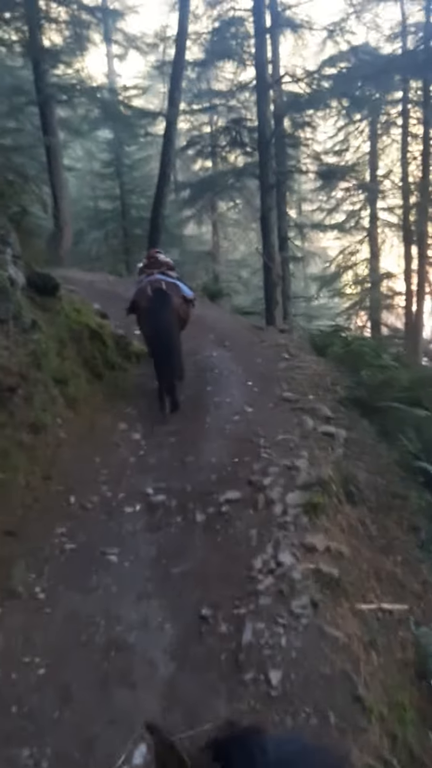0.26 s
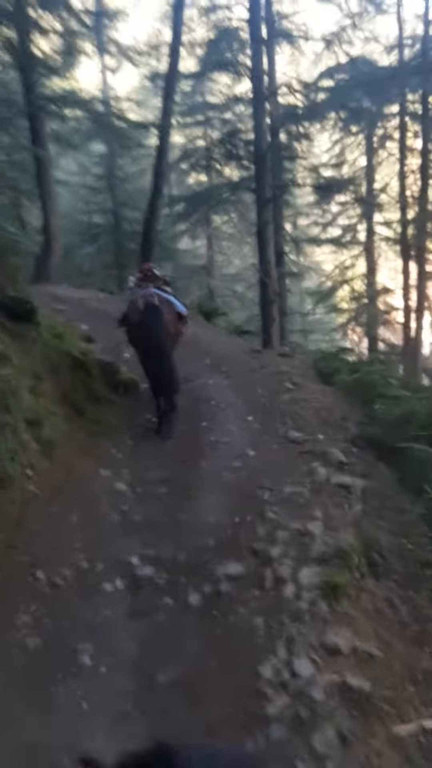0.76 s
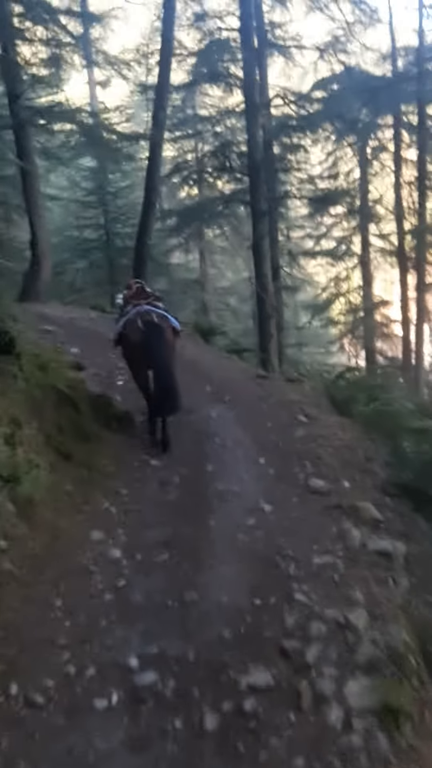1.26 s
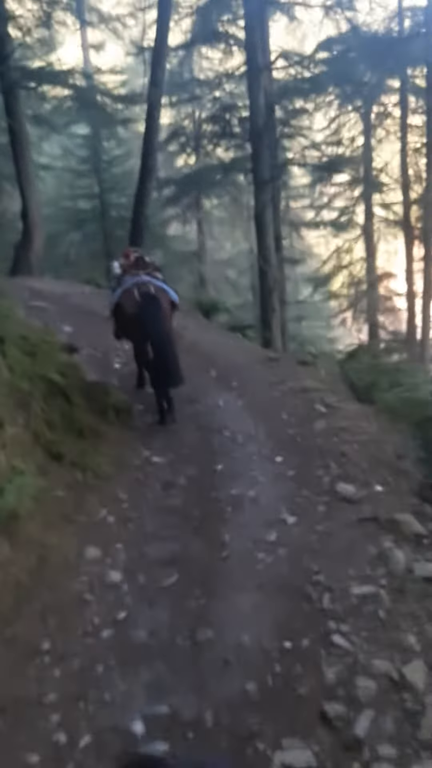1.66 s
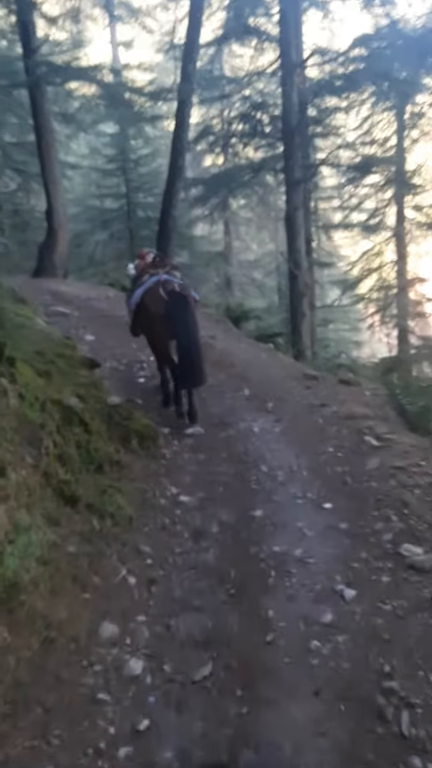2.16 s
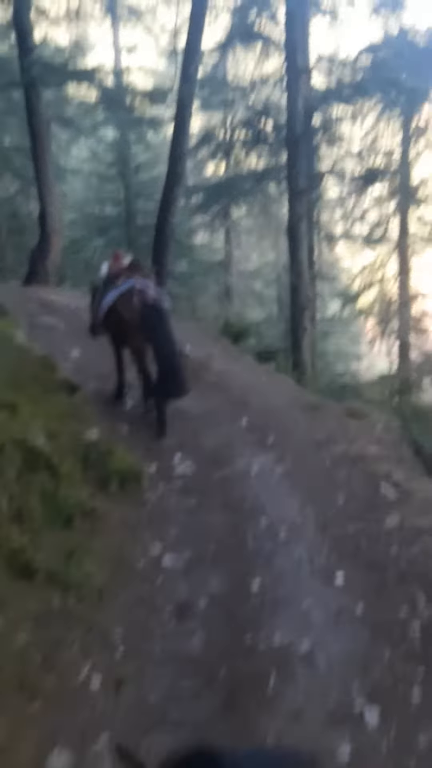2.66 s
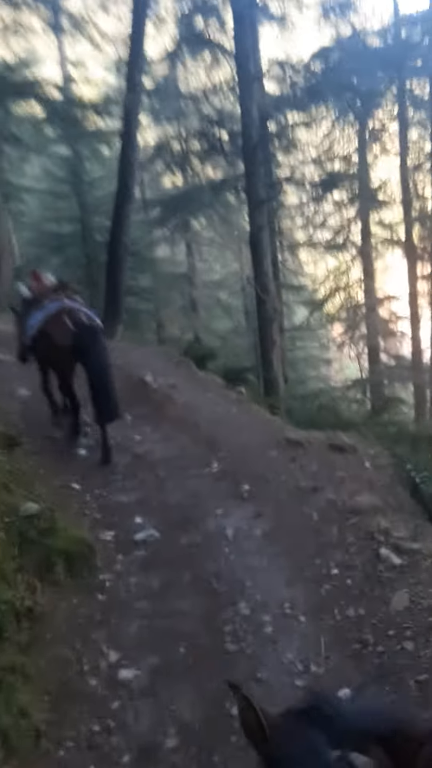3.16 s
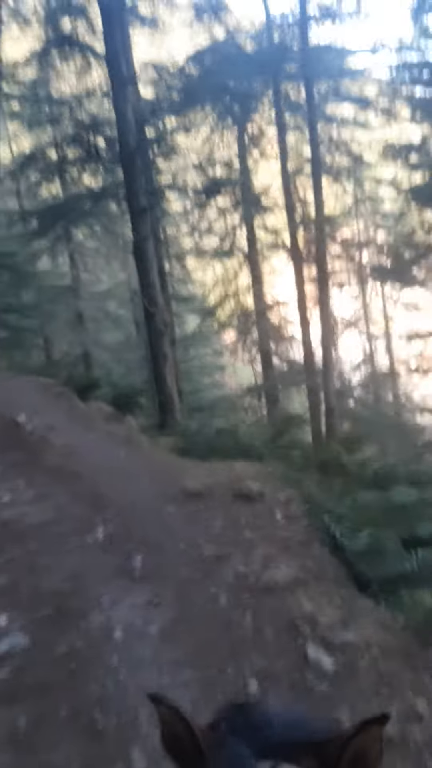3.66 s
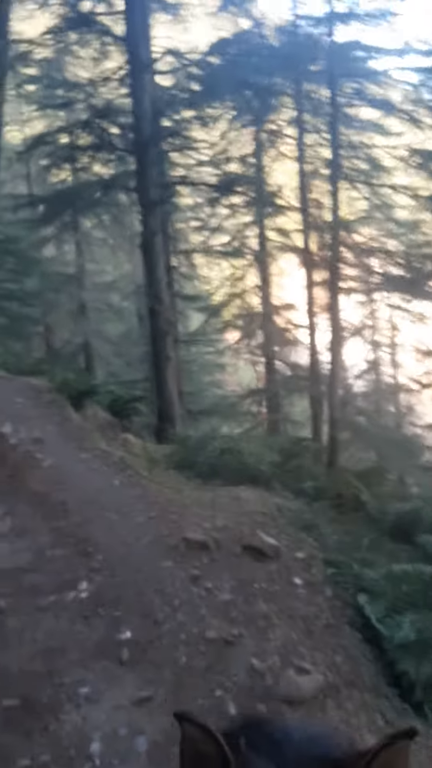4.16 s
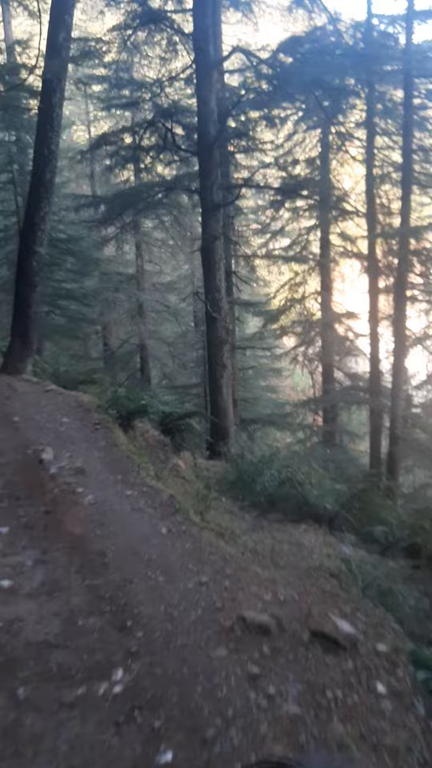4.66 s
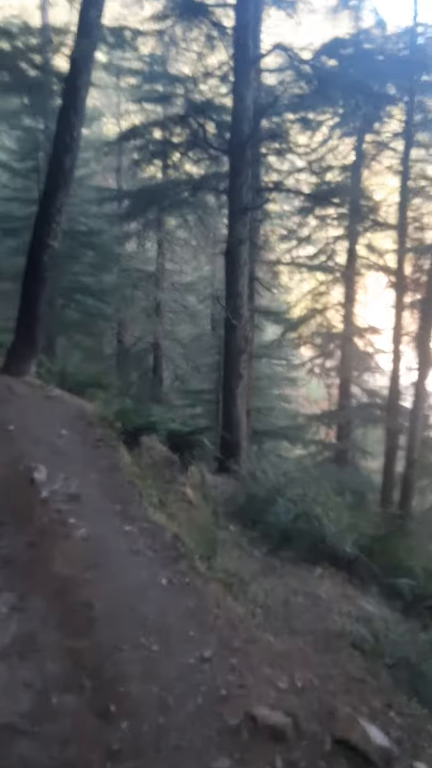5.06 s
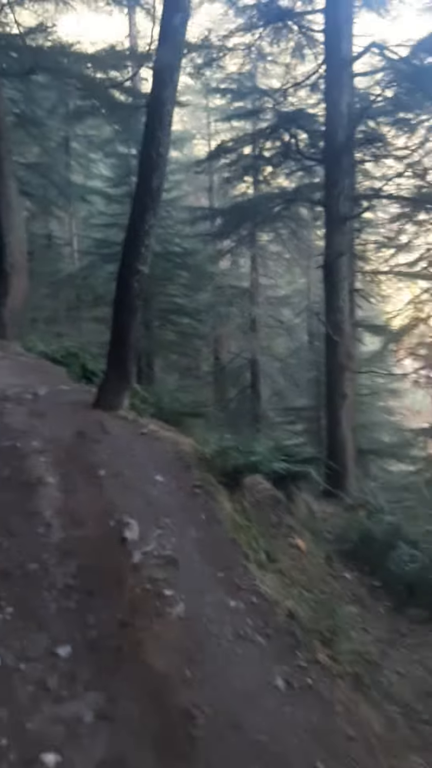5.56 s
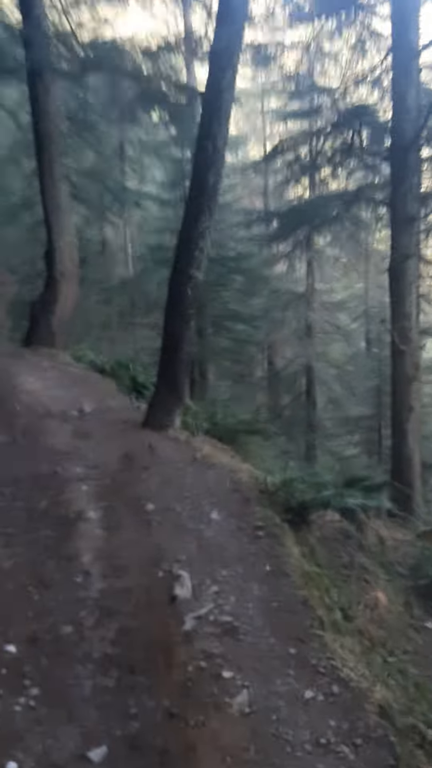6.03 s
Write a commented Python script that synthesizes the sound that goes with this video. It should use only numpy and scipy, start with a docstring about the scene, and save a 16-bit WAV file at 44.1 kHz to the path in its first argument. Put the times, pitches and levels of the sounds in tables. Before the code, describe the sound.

A horse walks up a stony forest trail for about six seconds, heard from the saddle on a hand-held microphone. Throughout, its hooves thud into packed dirt, clack on stones and crunch grit in an uneven rhythm, often as quick double hits. Clothes and saddle rub softly in swells, slightly to the right, over the faint low shuffle of a horse ahead. At about 0.9 seconds a sharp, loud knock hits the right side of the microphone. A sleeve brushes past with a light hiss near 0.7, 2.5 and 4.2 seconds. Between 3 and 4 seconds the tack and stone chips tick, with a brief thin strap squeak at 3.3. The steps are loudest from 3.8 to 5.2 seconds. A hoof drags lightly around 3 and 5.7 seconds. Heavy steps jolt the microphone with deep bumps at 3.5 seconds and several times after 5, strongest near 6.

```python
"""Hooves thud into packed dirt, clack on stone and crunch grit, often toe first and then heel, as a horse
walks up a stony forest trail; now and then one drags. Heard from the saddle, on the two microphones of a
hand-held camera. Close by, clothes and saddle rub with the gait, the tack ticks and squeaks, something
knocks against the right microphone and heavy steps jolt the camera. The horse ahead is faint."""
import sys
import numpy as np
from scipy import signal
from scipy.io import wavfile

SR = 44100
rng = np.random.default_rng(int(sys.argv[2]) if len(sys.argv) > 2 else 0)


def int16_out(signal):
    """Quantize to a 16-bit WAV file."""
    q = np.round(np.clip(np.atleast_2d(signal).T, -1, 1) * 32767)
    wavfile.write(sys.argv[1], SR, q.astype(np.int16))


N = 277521

# footfalls below the saddle: start_s, thud_db, thud_hz, clack_db, clack_hz, grit_db, heel_gain_db
FOOTFALLS = [(.0225, -40, 227, -36.5, 1150, -55, -2), (.2831, -32.5, 240, -45, 1300, -62, -10),
             (.473, -43, 170, -48, 1290, -55, -3), (.7362, -33, 260, -23, 1460, -56, -14),
             (.8094, -30.5, 240, -38, 1600, -48, -9), (1.1665, -34, 229, -31, 2000, -41, -11),
             (1.2621, -46, 220, -39, 1400, -57, -9), (1.358, -43, 220, -35, 1200, -56, -7),
             (1.857, -36, 165, -40, 1750, -41, -10), (1.9563, -41.5, 222, -47, 1150, -53, -11),
             (2.0468, -34, 235, -31, 2000, -34, -11), (2.1414, -31, 225, -43, 1700, -51, -2),
             (2.5081, -34, 315, -42, 1020, -59, -8), (2.593, -32.5, 231, -37, 1650, -45, -2),
             (2.767, -27.5, 212, -39, 1310, -39, -9), (3.0362, -38, 200, -28.5, 1650, -36, -10),
             (3.1313, -33, 285, -39, 1230, -42, -6), (3.398, -31, 265, -37, 2150, -43, -6),
             (3.5148, -33.5, 390, -32, 1280, -45, -8), (3.539, -32.5, 345, -33.5, 1070, -42, -5),
             (3.671, -37, 305, -35, 1150, -44, -8), (3.7805, -21.5, 262, -28, 1300, -35, -3),
             (3.9498, -39.5, 260, -35, 1180, -38, -8), (4.2451, -25, 230, -18, 1540, -30.5, -13),
             (4.4421, -22.5, 345, -24, 1330, -34, -1), (4.7145, -40, 190, -41.5, 1400, -53, -6),
             (4.9084, -29.5, 275, -23.5, 1360, -38, -11), (5.166, -30, 275, -30, 1620, -36, -1),
             (5.382, -37, 200, -36.5, 1380, -37.5, -6), (5.6037, -40, 280, -36, 1600, -40, -7),
             (5.677, -37, 290, -36, 1500, -44, 1), (5.79, -41, 185, -37, 1350, -52, -6),
             (6.0554, -23.5, 280, -30.5, 1780, -34.5, -3), (6.273, -30, 240, -40, 1400, -48, -2)]
# tone of grit and ticks: frequency_hz, gain_db
GRIT_TONE = [(300, -27), (1400, 8), (2500, 3), (6500, 5.5), (16000, -13)]


def amp(db):
    """Decibels to gain."""
    return 10 ** (np.asarray(db) / 20)


def unit_rms(x):
    """Scales to an rms of 1."""
    return x / np.sqrt(np.mean(x ** 2) + 1e-20)


def burst(x):
    """Scales a short sound to the energy of 5 ms at an rms of 1."""
    return x * np.sqrt(.005 * SR / (np.sum(x ** 2) + 1e-20))


def add(mix, start_s, sound):
    """Mixes a sound into both channels."""
    part = mix[:, max(round(start_s * SR), 0):][:, :sound.shape[1]]
    part += sound[:, :part.shape[1]]


def colour(x, outline, size=2048):
    """Causal filter with an outline of frequency_hz, gain_db."""
    hz, db = np.transpose(outline)
    bins_hz = abs(np.fft.fftfreq(size, 1 / SR))
    log_gain = np.log(amp(np.interp(np.log(bins_hz + 1), np.log(hz), db)))
    taps = np.fft.ifft(np.exp(np.conj(signal.hilbert(log_gain)))).real
    return signal.oaconvolve(x, taps[None], axes=1)[:, :x.shape[1]]


def passband(x, hz, kind):
    """Second-order low-pass or high-pass."""
    return signal.lfilter(*signal.butter(2, hz, kind, fs=SR), x)


def resonate(x, hz, width_hz):
    """One damped resonance."""
    r = np.exp(-np.pi * width_hz / SR)
    return signal.lfilter([1, -1], [1, -2 * r * np.cos(2 * np.pi * hz / SR), r * r], x)


def wander(per_s):
    """Slow random drift around zero."""
    knots = rng.standard_normal(2000)
    return np.interp(np.arange(N) / SR * per_s, np.arange(len(knots)), knots)


def grains(per_s, spread_db=10):
    """A stream of tiny cracks of uneven size in each channel."""
    signs = rng.choice([-1, 1], (2, N))
    sizes = amp(rng.uniform(-spread_db, spread_db, (2, N)))
    return unit_rms(signs * sizes * (rng.random((2, N)) < per_s / SR))


def ports(x, left_db, lag_samples=20):
    """Sound from below reaches the left microphone port later and weaker."""
    return np.array([amp(left_db) * np.pad(x[0], (lag_samples, 0))[:N], x[1]])


def thud(t, hz, soft, cycles=1.1, sag=.13, soil=.54, rise_s=.0008):
    """Hoof and dirt ring, sinking in pitch; soft ground rings longer and rounder, hard ground crumbles."""
    turns = hz * (t - sag * t * t / (t + .04))
    ring = -np.sin(2 * np.pi * turns) * np.exp(-turns / (cycles * (1 + soft / 2)))
    crumble = resonate(rng.standard_normal(len(t)), hz * 1.8, hz * 1.8) * np.exp(-t / .0086)
    crumble = passband(crumble, hz * 3.3, "low")
    attack = 1 - np.exp(-t / (rise_s * (1 + 2 * soft)))
    impact = (burst(ring) + soil * (1 - soft / 2) * burst(crumble)) * attack
    return burst(passband(impact, 100, "high"))


def clack(t, hz, width_hz=650, hollow=.95, sole=.46, scatter=.62, linger=.05):
    """Horn meets stone: one push rings hoof wall, hollow and sole; ground, legs and trunks scatter it."""
    push = -np.exp(-t / .00033) * (1 - np.exp(-t / .00003))
    wall = burst(resonate(push, hz, width_hz)) + hollow * burst(resonate(push, hz, 170))
    hoof = burst(wall) + sole * burst(resonate(push, hz * .52, 280))
    direct = burst(passband(hoof, hz * 2.3, "low"))
    spread = (1 - np.exp(-(t / .0024) ** 2)) * (np.exp(-t / .0058) + linger * np.exp(-t / .048))
    shared, *sides = rng.standard_normal((3, len(t)))
    echoes = [resonate(spread * (shared + 1.56 * side), hz, width_hz) for side in sides]
    echoes = passband(echoes, hz * 1.4, "low")
    return np.array([burst(direct + scatter * burst(echo)) for echo in echoes])


def crunch(t, hz, decay_s, tail=.15, stone=.45):
    """A quickly thinning spray of tiny fractures; each patch of stones has its own short ring."""
    attack = 1 - np.exp(-t / (.12 * decay_s))
    fade = np.exp(-t / decay_s) + tail * np.exp(-t / .024)
    spray = rng.laplace(size=(2, len(t))) * attack * fade
    return np.array([burst(burst(side) + stone * burst(resonate(side, hz, 600))) for side in spray])


def earth(t, hz=82, width_hz=90, decay_s=.028):
    """The ground goes on shuddering briefly under the horse's weight."""
    shudder = resonate(resonate(rng.standard_normal(len(t)), hz, width_hz), hz, width_hz)
    return burst(shudder * (1 - np.exp(-t / .0072)) * np.exp(-t / decay_s))


def hooves(earth_db=-25, soft_range_db=10, heel_pitch=.83, heel_dull_db=-5):
    """Below the rider, toe and heel each thud, clack and crunch; the heel lands lower and duller."""
    t = np.arange(SR // 6) / SR
    body, grit = np.zeros((2, 2, N))
    for start_s, thud_db, thud_hz, clack_db, clack_hz, grit_db, heel_db in FOOTFALLS:
        lag_s = .0018 * 2 ** (-thud_db / 15)  # a heavy step rolls onto the heel sooner
        soft = np.clip((thud_db - clack_db) / soft_range_db, 0, 1)  # soft ground: more thud than clack
        toe = (start_s, 0, 1, 0)
        heel = (start_s + lag_s, heel_db, heel_pitch, heel_dull_db)
        for at_s, db, pitch, dull_db in toe, heel:
            dirt = amp(thud_db) * thud(t, thud_hz * pitch, soft)
            stone = amp(clack_db + dull_db) * clack(t, clack_hz)
            add(body, at_s, amp(db) * (dirt + stone))
            spray = crunch(t, rng.uniform(3200, 5200), decay_s=.0053)
            add(grit, at_s, amp(db + grit_db + dull_db) * spray)
        add(body, start_s, amp(thud_db / 2 + earth_db) * earth(t)[None])
    return ports(body, left_db=-2) + ports(colour(grit, GRIT_TONE), left_db=-3.5)


def cloth_db(jolt_db=-18, jolt_s=.025):
    """Level of the rubbing: a steady part, swells as the rider sways and a jolt with each footfall."""
    # steady rubbing: time_s, level_db
    steady = [(0, -61), (1.02, -66.5), (2.15, -61), (2.3, -67.5), (2.42, -59.3), (4.2, -54), (5.48, -65.5)]
    # strokes of clothes on the saddle: middle_s, half_length_s, level_db
    strokes = [(.26, .11, -51), (0.502, .075, -54), (.76, .135, -51), (1.66, .16, -57.5),
               (2.55, 0.11, -50.5), (3.01, .08, -51), (3.34, .17, -50), (3.995, 0.08, -45),
               (4.9, .055, -50), (5.13, .07, -53), (5.34, .08, -55), (5.82, .055, -54), (6.17, .2, -53.5)]
    t = np.linspace(0, N / SR, 2000)
    power = amp(np.interp(t, *np.transpose(steady))) ** 2
    power += sum((amp(db) * np.exp(-abs((t - s) / half_s) ** 3)) ** 2 for s, half_s, db in strokes)
    for s, *_, grit_db, _ in FOOTFALLS:  # grittier steps jolt the saddle more
        power += amp(grit_db + jolt_db) ** 2 * (t > s) * np.exp(-abs(t - s) / jolt_s)
    return np.interp(np.arange(N) / SR, t, 10 * np.log10(power))


def rubbing(crackle=.55):
    """Cloth slides close to the microphones with the gait: a fine hiss with crisp little catches."""
    # tone of the cloth: frequency_hz, gain_db
    cloth_tone = [(80, -8), (300, 1.5), (1050, 7), (2200, 4.3), (7000, 5.5), (16000, -1)]
    friction = rng.laplace(size=(2, N)) + crackle * grains(per_s=90)
    hiss = unit_rms(colour(friction, cloth_tone))
    return ports(hiss * amp(cloth_db() + 4 + 2.2 * wander(per_s=120)), left_db=-5.5)


def trail(steps_per_s=22, step_db=-56, floor_db=-59.5):
    """Low shuffle of the moving animals, with faint steps of the horse ahead and rolling pebbles."""
    # tone of the shuffle: frequency_hz, gain_db
    shuffle_tone = [(25, -19), (80, 2.5), (300, 2.5), (600, -6), (1300, -5), (2500, -21.5), (16000, -41)]
    t, steps = np.arange(SR // 8) / SR, np.zeros((2, N))
    for when, size, octave, soft in rng.random((int(steps_per_s * N / SR), 4)):
        step = (1 - soft) * clack(t, 900 * 2 ** octave, scatter=1) + soft * thud(t, 150 * 2 ** octave, soft)
        add(steps, when * N / SR, amp(step_db + 10 * size ** 2) * step)
    shared, *sides = rng.standard_normal((3, N))
    shuffle = unit_rms(colour(shared + .78 * np.array(sides), shuffle_tone))
    shuffle *= amp(floor_db + 1.1 * wander(per_s=28))
    motion_db = cloth_db() - np.mean(cloth_db())
    return ports((steps + shuffle) * amp(.67 * motion_db), left_db=-1)


def scuffs():
    """Hooves lightly catch soft soil and loose pebbles."""
    # light touches: start_s, soil_db, pebble_db
    touches = [(.137, -53, -46), (.212, -53, -42), (.727, -38, -38), (.833, -30, -45), (1.081, -51, -41),
               (1.208, -45, -45), (1.633, -44, -55), (1.695, -44, -48), (2.338, -44, -58),
               (2.806, -35, -44), (3.012, -38, -39), (3.713, -42, -43), (4.4155, -44, -33),
               (4.659, -53, -43), (4.842, -53, -42), (5.626, -38, -37), (6.088, -39, -38)]
    t, out = np.arange(SR // 6) / SR, np.zeros((2, N))
    for start_s, soil_db, pebble_db in touches:
        soil = amp(soil_db) * thud(t, hz=220, soft=1)
        pebble = amp(pebble_db) * clack(t, hz=rng.uniform(1000, 1700))
        add(out, start_s, soil + pebble)
    return ports(out, left_db=-2)


def swishes(half_length_s=.054):
    """A sleeve brushes past the right microphone with a bright fizz."""
    # passes of the sleeve: middle_s, level_db
    passes = [(.69, -49), (2.53, -45.5), (4.18, -45.5)]
    t = np.arange(N) / SR
    swell = sum(amp(db) * np.exp(-((t - s) / half_length_s) ** 2) for s, db in passes)
    fizz = unit_rms(resonate(rng.laplace(size=(2, N)), hz=11100, width_hz=5000))
    return ports(fizz * swell, left_db=-24)


def knock(wobble_db=-10):
    """Two taps press air into the right port, and the casing wobbles after the second."""
    # taps on the microphone: start_s
    taps = [.9242, .9318]
    t, out = np.arange(SR // 5) / SR, np.zeros((2, N))
    push = (1 - np.exp(-t / .00018)) * (2.2 * np.exp(-t / .001) - .54 * np.exp(-t / .0044))
    wobble = -np.sin(2 * np.pi * 112 * t) * np.exp(-t / .0115)
    wobble += 1.18 * np.sin(2 * np.pi * 50 * t) * np.exp(-t / .014)
    wobble *= 1 - np.exp(-(t / .0046) ** 2)
    for start_s in taps:
        add(out, start_s, push[None])
    add(out, taps[-1] + .0028, amp(wobble_db) * wobble[None])
    return ports(out, left_db=-43)


def ticks():
    """The tack and flying stone chips tick with a short, high ring."""
    # small hits: start_s, level_db, pitch_hz
    hits = [(2.0468, -35, 2900), (3.178, -42, 4300), (3.247, -40, 2500), (3.412, -38, 5500),
            (3.467, -40, 5500), (3.484, -41, 2500), (3.5205, -36, 6000), (3.9502, -34, 3550),
            (5.6037, -38, 4300), (5.802, -38, 5000), (6.088, -36, 3500)]
    t, out = np.arange(SR // 6) / SR, np.zeros((2, N))
    for start_s, db, hz in hits:
        add(out, start_s, amp(db) * crunch(t, hz, decay_s=.0015, tail=.05, stone=.7))
    return ports(colour(out, GRIT_TONE), left_db=-3.5)


def scrapes(width_s=.04, soil_hz=250, gravel_hz=1550):
    """A dragging hoof ploughs the soil with a low scuff and grinds gravel against its wall."""
    # drags between steps: middle_s, soil_db, gravel_db
    drags = [(3.025, -50, -53), (3.75, -58, -51), (5.665, -47, -45), (5.985, -50, -60)]
    t = np.arange(N) / SR
    soil_swell = sum(amp(db) * np.exp(-((t - s) / width_s) ** 2 / 2) for s, db, _ in drags)
    gravel_swell = sum(amp(db) * np.exp(-((t - s) / width_s) ** 2) for s, _, db in drags)
    scuff = resonate(resonate(rng.standard_normal(N), soil_hz, soil_hz / 2), soil_hz, soil_hz)
    grind = resonate(resonate(grains(per_s=2500), gravel_hz, gravel_hz), gravel_hz, gravel_hz)
    return ports(soil_swell * unit_rms(scuff) + gravel_swell * unit_rms(grind), left_db=-1)


def squeak(start_s=3.298, length_s=.075, width_hz=80):
    """A strap slips through its buckle with a thin, rough whistle."""
    # partials of the whistle: pitch_hz, level_db
    partials = [(3300, -49.5), (7400, -51), (8850, -44), (15400, -45.5)]
    n, out = int(length_s * SR), np.zeros((2, N))
    whistle = sum(amp(db) * unit_rms(resonate(rng.standard_normal((2, n)), hz, width_hz))
                  for hz, db in partials)
    add(out, start_s, whistle * np.sqrt(signal.windows.hann(n)))
    return out


def camera_bumps(hz=98, decay_s=.011):
    """Jolted in the hand, the camera answers with a deep, round wobble."""
    # jolts from heavy steps: start_s, level_db
    jolts = [(3.546, -29.5), (5.171, -27), (5.627, -30), (6.063, -22), (6.275, -31)]
    t, out = np.arange(SR // 8) / SR, np.zeros((2, N))
    wobble = burst(np.sin(2 * np.pi * hz * t) * np.exp(-t / decay_s) * (1 - np.exp(-t * hz * 2)))
    for start_s, db in jolts:
        add(out, start_s, amp(db) * wobble[None])
    return ports(out, left_db=-2)


def scene():
    """Horse, rider and trail as they reach the two microphones above the saddle."""
    horse = hooves() + scuffs() + ticks() + scrapes()
    close_by = camera_bumps() + knock() + rubbing() + swishes() + squeak()
    return horse + close_by + trail()


def record(dry, edge_hz=16000):
    """The camera's ports notch the treble; overloads clip and the top of the band is cut off."""
    # microphone response: frequency_hz, gain_db
    response = [(7400, 0), (8300, -7), (9300, -19), (10200, -14), (11200, -5.5), (12500, -2)]
    clipped = np.clip(colour(dry, response), -1, 1)
    band_limit = signal.firwin(511, edge_hz, window=("kaiser", 9), fs=SR)
    return signal.oaconvolve(clipped, band_limit[None], "same", axes=1)


dry = scene()
out = record(dry)
int16_out(out)
```